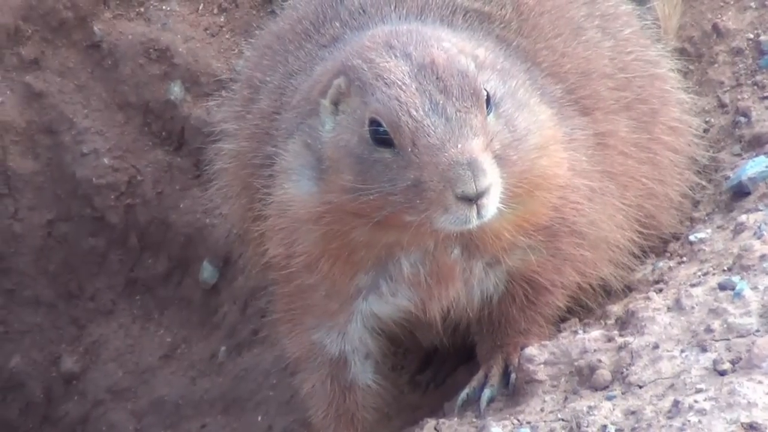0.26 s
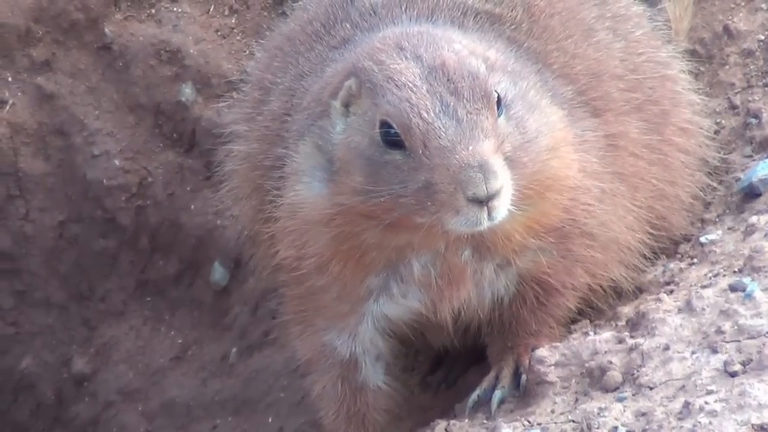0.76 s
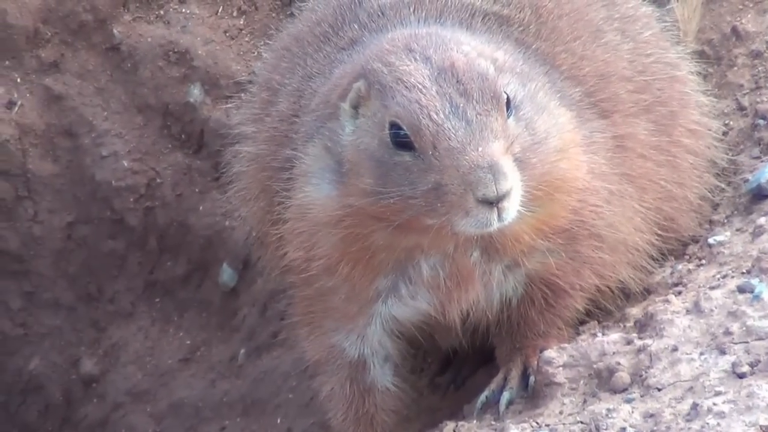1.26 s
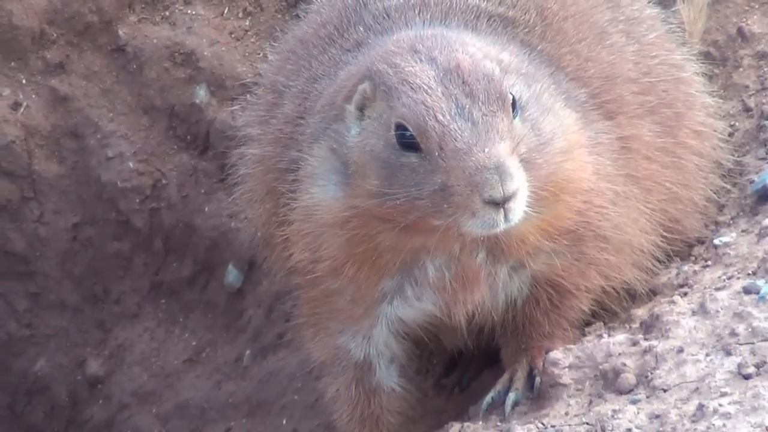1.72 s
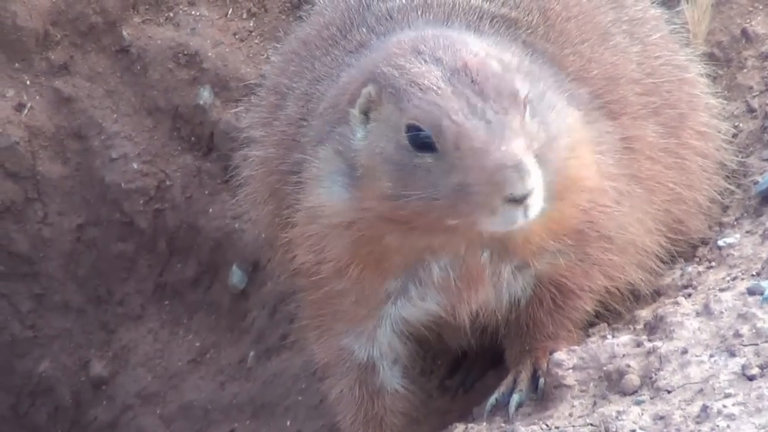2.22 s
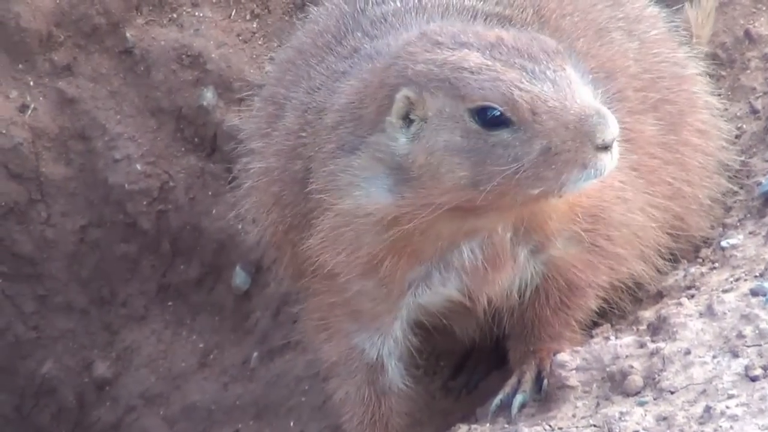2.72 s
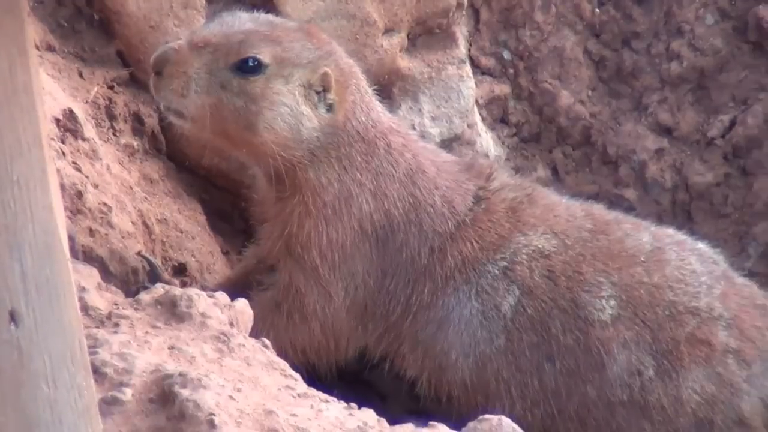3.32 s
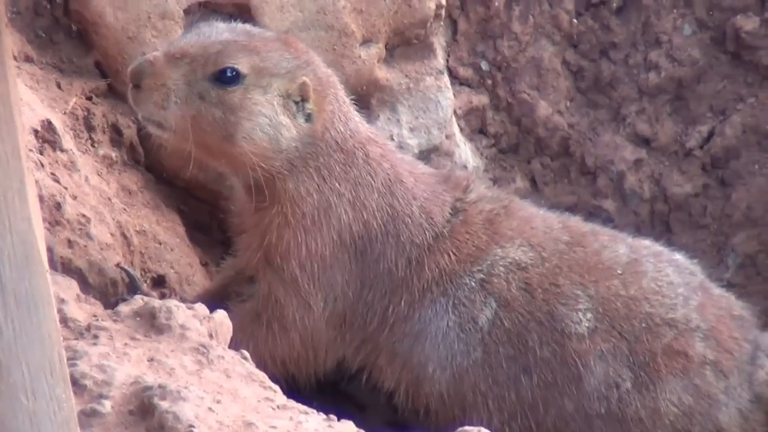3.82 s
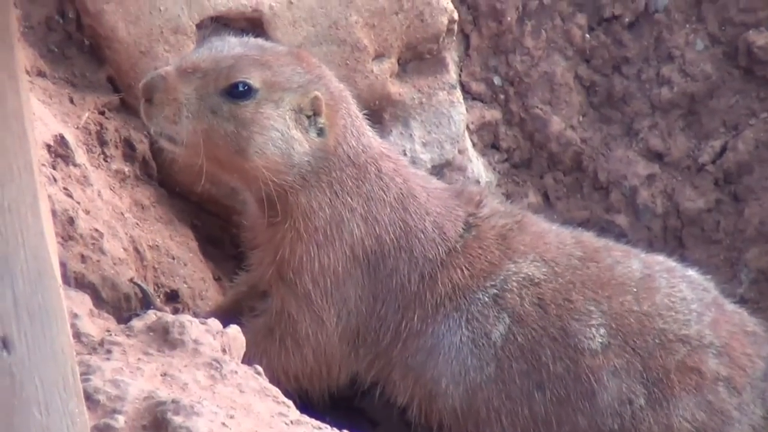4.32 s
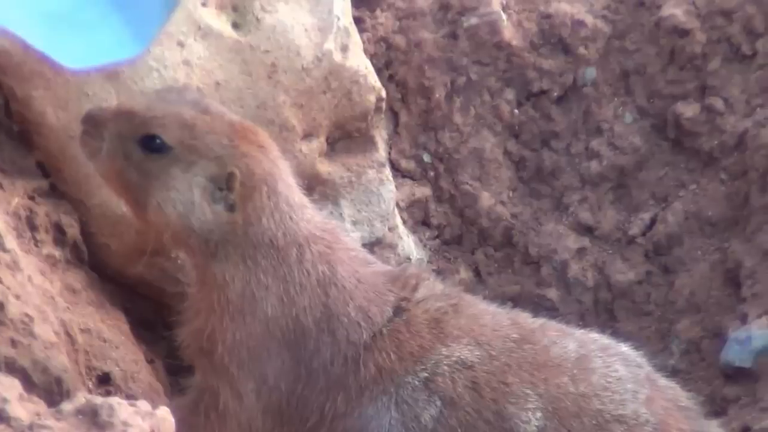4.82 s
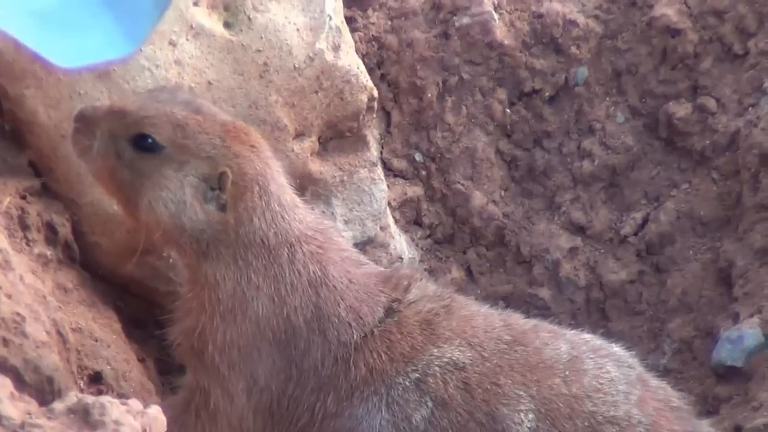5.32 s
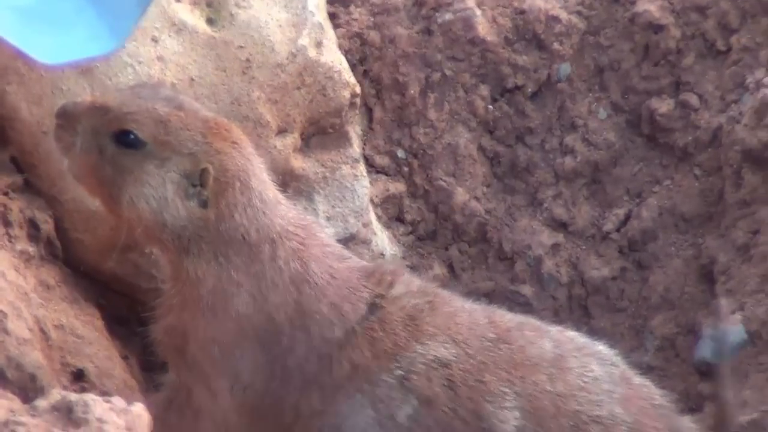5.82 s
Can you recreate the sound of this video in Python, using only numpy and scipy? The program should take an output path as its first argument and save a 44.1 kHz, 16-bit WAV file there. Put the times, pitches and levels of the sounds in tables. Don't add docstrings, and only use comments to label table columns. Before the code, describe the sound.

Quiet outdoor air with faint distant bird whistles, then an abrupt cut to a prairie dog giving sharp, high, evenly spaced barks close by.

```python
import sys
import numpy as np
from scipy import signal
from scipy.fft import rfft, irfft
from scipy.io import wavfile
from scipy.ndimage import uniform_filter1d

SR = 44100
rng = np.random.default_rng(int(sys.argv[2]) if len(sys.argv) > 2 else 0)


def rack_gain(trim_db):
    fader = np.asarray(trim_db, float)
    return 10 ** (fader / 20)


def dump(signal):
    limited = np.clip(np.atleast_2d(signal).T, -1, 1)
    pcm = np.round(limited * 32767).astype(np.int16)
    wavfile.write(sys.argv[1], SR, pcm)


N = 267246
CHANGE_S, TURN_S = 2.9243, 4.75


def rms_one(x):
    return x / np.sqrt(np.mean(x ** 2) + 1e-20)


def at_hz(points, hz):
    points_hz, values = np.array(points).T
    return np.interp(np.log(hz), np.log(points_hz), values)


def band(x, low_hz, high_hz):
    sos = signal.butter(2, [low_hz, min(high_hz, SR / 2.1)], "band", fs=SR, output="sos")
    return signal.sosfilt(sos, x)


def wobble(size, hz):
    settle = 4000
    sos = signal.butter(4, hz, fs=SR, output="sos")
    return rms_one(signal.sosfilt(sos, rng.standard_normal(size + settle))[settle:])


# frequency in Hz, level in dB per Hz.
AIR_COLOUR = [(15, -59), (25, -52), (44, -14.5), (90, -6.5), (130, -3), (199, -3.5), (260, -7),
              (443, -10.5), (534, -10.5), (934, -13), (1430, -19.5), (2780, -23), (5560, -28), (7860, -22),
              (14500, -36)]
# frequency in Hz, change in dB.
RECOLOUR = [(30, 8.5), (100, 0), (300, 2), (1000, 0.8), (2500, 2.5), (5000, 1.2), (8000, 4.5), (13000, 0)]
# frequency in Hz, left minus right in dB.
AIR_LEAN = [
    [(60, 7), (180, 3.5), (540, 5.5), (1640, 2.5), (4920, -0.5), (14800, -4)],
    [(60, 0), (180, 1), (540, 4), (1640, 1.5), (4920, -1.5), (14800, -3)],
]
# frequency in Hz, likeness from 0 to 1.
LIKENESS = [(60, 0.9), (180, 0.95), (540, 0.91), (1640, 0.97), (4920, 0.72), (14800, 0.62)]
# frequency in Hz, width in Hz, level
# in dB over the hiss.
WHINES = [(2790, 40, 6.5), (3010, 21, 10.5), (7150, 22, 11.5), (7800, 71, 0), (8400, 30, 5), (8930, 74, 7),
          (14740, 180, 7), (13750, 980, 7.5)]


def air(change, lean, level_db):
    mid, side = rfft(rng.standard_normal((2, N)))
    hz = np.arange(len(mid)) * SR / N + 1
    alike = np.clip(at_hz(LIKENESS, hz), 0, 1)
    pair = np.sqrt(1 + alike) * mid + np.sqrt(1 - alike) * side * [[1], [-1]]
    whine_db = sum(db / (1 + (2 * (hz - at) / width) ** 2) for at, width, db in WHINES)
    colour_db = at_hz(AIR_COLOUR, hz) + change * at_hz(RECOLOUR, hz) + whine_db
    side_db = at_hz(lean, hz) * [[.5], [-.5]]
    noise = rms_one(irfft(pair * rack_gain(colour_db + side_db), N))
    return rack_gain(level_db + 0.27 * wobble(N, hz=4.1)) * noise


def glides(notes, overtone_db, uneven_db):
    out = np.zeros(N)
    for s, length, from_hz, to_hz, level_db in notes:
        at, size = round(s * SR), round(length * SR)
        turns = 2 * np.pi * np.cumsum(np.linspace(from_hz, to_hz, size)) / SR
        whistle = np.sin(turns) + rack_gain(overtone_db) * np.sin(2 * turns)
        level = rack_gain(level_db + 6.5 + uneven_db * wobble(size, hz=180))
        out[at:at + size] += level * signal.windows.tukey(size, .5) * whistle
    return out


# start in seconds, length in seconds, from Hz, to Hz, level in dB.
BIRD_NOTES = [(.575, 0.03, 3640, 3510, -47.5), (.598, 0.031, 3600, 1530, -49),
              (.64, 0.021, 3460, 3900, -47), (.662, 0.03, 3730, 2120, -49),
              (1.012, 0.033, 3670, 3630, -45.5), (1.036, .027, 3654, 2040, -48.5),
              (1.07, 0.0244, 3300, 3780, -46.5), (1.108, 0.0202, 3510, 2600, -50.5),
              (2.137, .022, 5170, 4560, -57.5), (2.188, 0.021, 3840, 3400, -60),
              (2.615, .024, 5200, 4600, -63)]


def far_birds():
    return glides(BIRD_NOTES, overtone_db=-17, uneven_db=3.0)


# delay in seconds, level in dB, twice the left minus right in dB.
ECHOES = [(.004, -16, 58), (.0105, 1.5, -8.5), (.021, -27.5, -3), (.044, -16, -7), (.062, -42, -4),
          (.118, -33.5, -17), (.145, -59, -22)]


def pen(x, near_db, far_db, echo_db, lumpy_db):
    near_t60_s, far_t60_s = 0.27, 0.98
    t = np.arange(SR * 3 // 4) / SR
    shared, own = rng.standard_normal((2, len(t)))
    apart = 0.19 * band(band(own, 3900, 16000), 3900, 16000) + 0.25 * own
    build = np.minimum(t / .009, 1)
    scatter = (shared + apart * [[1], [-1]]) * rack_gain(lumpy_db * wobble(len(t), hz=88)) * build
    answer = scatter * (rack_gain(near_db - 60 * t / near_t60_s) + rack_gain(far_db - 60 * t / far_t60_s))
    for k, (delay, level_db, pan_db) in enumerate(ECHOES):
        side_db = pan_db * np.array([.25, -.25])
        answer[:, round(delay * SR)] += rack_gain(level_db + echo_db + side_db) * (-1) ** k
    answer = band(answer, 2140, 8440)
    return signal.fftconvolve(x[None], answer, axes=1)[:, :N]


REST_HZ, SAG_HZ_PER_S = (1609, 1585), (28000, 17800)
ATTACK_S, ATTACK_DB, MUFFLED_DB = (0.0063, 0.0085), (-9.5, -11.5), (-2, 0)
EASE_S, EASE_DB = (.018, 0.022), (0, 3.5)
CREST_DB, RELEASE_DB = (9, 9.5), (-3, -12)
UNDERSHOOT_HZ = (39.7, -6)
OPEN_HZ, BRIGHT_DB_PER_HZ = (1782, 1680), (0.17, 0.2)
BRIGHT_DB, CLOSING_DB = (2.5, 3.5), (-5.5, 0.8)
FLUTTER_START, FLUTTER_EASE, FLUTTER_CREST = (0.11, 0.056), (0.3, 0.16), (0.18, 0.18)


def bark_controls(crest_s, crest_hz, climb_s, push_db, pose):
    rest_hz, sag = REST_HZ[pose], SAG_HZ_PER_S[pose]
    end_s = crest_s + (crest_hz - rest_hz + UNDERSHOOT_HZ[pose]) / sag
    t = np.arange(round(end_s * SR)) / SR
    climb = (1 - np.exp(-t / climb_s)) / (1 - np.exp(-crest_s / climb_s))
    pitch_hz = np.minimum(rest_hz + (crest_hz - rest_hz) * climb, crest_hz - sag * (t - crest_s))

    lazy_db = 525 * climb_s
    stages = [0, ATTACK_S[pose], EASE_S[pose], crest_s, end_s]
    efforts = [ATTACK_DB[pose], 0, EASE_DB[pose] - lazy_db / 2,
               CREST_DB[pose] - lazy_db, RELEASE_DB[pose] - lazy_db / 2]
    effort_db = push_db + np.interp(t, stages, efforts)

    mouth_db = BRIGHT_DB_PER_HZ[pose] * np.minimum(pitch_hz - OPEN_HZ[pose], 0)
    stage_db = np.interp(t, stages[:4], [MUFFLED_DB[pose], 0, 0, CLOSING_DB[pose]])
    bright_db = BRIGHT_DB[pose] + mouth_db + stage_db
    flutters = [FLUTTER_START[pose], FLUTTER_EASE[pose], FLUTTER_CREST[pose]]
    flutter = np.interp(t, stages[1:4], flutters)
    return pitch_hz, effort_db, bright_db, np.clip(flutter, 0, 1)


# start in seconds, time to the crest in seconds, crest pitch in Hz,
# climb time in seconds, effort in dB.
BARKS = [
    (2.867, .034, 1955, 0.00597, -15),
    (3.298, .034, 1849, .011, -13.5),
    (3.711, .0325, 2020, .008, -13.5),
    (4.118, .029, 2064, 0.0062, -13.5),
    (4.605, 0.032, 1810, .022, -12),
    (5.095, .034, 1825, 0.015, -18.5),
    (5.49, 0.034, 1844, 0.018, -16.5),
    (5.863, .036, 1837, 0.014, -18),
]
# frequency in Hz, level in dB.
THROAT = [
    [(1600, -23), (1900, -10.5), (3300, 0), (3700, -2), (4150, -5), (5000, -23.5), (6100, -3), (6700, -12),
     (7250, -7), (8200, 3), (9300, -22), (10300, -14), (10900, -48), (11700, -20)],
    [(1600, -16.5), (1850, -7), (3250, 0), (3700, 7.5), (5000, -24), (5700, -12), (6500, -14), (6950, -6.5),
     (7250, -19), (7600, 2.5), (8400, -12), (8800, -14.5), (9300, -29), (11000, -48)],
]


def barks():
    out = np.zeros(N)
    for s, *call_shape in BARKS:
        at, pose = round(s * SR), int(s > TURN_S)
        pitch_hz, effort_db, bright_db, flutter = bark_controls(*call_shape, pose)
        size = len(pitch_hz)
        pitch_hz = uniform_filter1d(pitch_hz, size=120, mode="nearest")
        pitch_hz = pitch_hz * (1 + 0.0097 * wobble(size, hz=295))
        slow_hz = 372 * pitch_hz / 1830 * (1 + 0.074 * wobble(size, hz=120))
        call = 0
        for k in range(1, 7):
            shake = flutter * min(0.22 * k, 1.3)
            for side, share in ((0, 0.73), (-0.7, 0.48 * shake), (0.93, 1.77 * shake)):
                hz = k * pitch_hz + side * slow_hz
                level_db = at_hz(THROAT[pose], hz) + effort_db + bright_db * (k > 2)
                level_db = level_db - np.maximum(hz - 11900, 0) / 40
                rough = 1 + (0.03 + 0.25 * shake) * wobble(size, hz=400)
                tone = np.sin(2 * np.pi * np.cumsum(hz) / SR + k * side)
                call = call + share * rack_gain(level_db + 5.5) * rough * tone
        air_flow = rng.standard_normal(size) * flutter * rack_gain(effort_db)
        low = rack_gain(5.0) * band(band(air_flow, 2320, 3720), 2320, 3720)
        high = rack_gain(5.5 + bright_db) * band(band(band(air_flow, 5600, 9900), 5600, 9900), 5600, 9900)
        from_edge = np.minimum(np.arange(size), np.arange(size)[::-1])
        fade = np.minimum(1, from_edge / (0.0014 * SR))
        out[at:at + size] += fade * (call + low + high)
    return out


# peak time in seconds, level in dB.
STROKES = [
    (4.364, -32),
    (4.374, -31),
    (4.406, -33.5),
]


def stroke_db(t):
    levels = []
    for s, db in STROKES:
        dig_db = 2000 * (t - s)
        lift_db, trickle_db = 500 * (s - t), -12 + 130 * (s - t)
        levels.append(db + np.where(t < s, dig_db, np.maximum(lift_db, trickle_db)))
    return np.max(levels, axis=0)


def scuff():
    at, size, out = round(STROKES[0][0] * SR) - SR // 20, SR // 4, np.zeros(N)
    t = (at + np.arange(size)) / SR
    grit_db, dust_db = stroke_db(t), -12.5 + stroke_db(t - 0.0097)
    grains = rng.standard_normal(size) * rack_gain(3 * wobble(size, hz=200))
    grit = rms_one(band(band(grains, 1650, 2800), 1530, 3100))
    dust = rms_one(band(grains, 5700, 9200))
    out[at:at + size] = rack_gain(grit_db) * grit + rack_gain(dust_db) * dust
    return out


# start in seconds, length in seconds, from Hz, to Hz, level in dB.
TICK_AND_ANSWER = [
    (4.555, 0.0053, 1890, 3900, -43),
    (4.758, 0.055, 3770, 3830, -54),
]


def tick_and_answer():
    return glides(TICK_AND_ANSWER, overtone_db=-22, uneven_db=5.5)


def scene():
    birds, voice = far_birds(), barks()
    small = scuff() + tick_and_answer()
    distant = band(band(birds, 1800, 3540), 2400, 3660)
    first = air(0, AIR_LEAN[0], level_db=-41.5) + birds
    first = first + pen(distant, near_db=-58, far_db=-31.5, echo_db=-45, lumpy_db=0)
    pan_db = 1.6
    second = air(1, AIR_LEAN[1], level_db=-41.5)
    second = second + (voice + small) * rack_gain([[pan_db / 2], [-pan_db / 2]])
    second += pen(voice + small, near_db=-42.0, far_db=-68, echo_db=-9.0, lumpy_db=2.5)
    return np.where(np.arange(N) < CHANGE_S * SR, first, second)


# frequency in Hz, drop in dB.
SPARE = [(700, 45), (1200, 25), (2500, 28), (4600, 15), (7000, 19), (9800, 3.5), (11500, 3.5), (14000, 4)]


def starve(x, share, recover_db_s):
    hz, t, z = signal.stft(x, SR, "cosine", 2048)
    bands = z[:, :1024].reshape(2, 128, 8, -1)
    band_hz = hz[4:1024:8]
    level_db = 10 * np.log10((np.abs(bands) ** 2).sum(axis=(0, 2)) + 1e-15)
    peak_db = level_db.max(axis=0)
    loud_db = np.maximum(peak_db - np.median(peak_db), 0)
    busy_db = np.maximum.accumulate(loud_db + recover_db_s * t) - recover_db_s * t
    chance_db = 4.5 * uniform_filter1d(rng.standard_normal(level_db.shape), 3)
    hungry = (t > CHANGE_S) & (t < TURN_S)
    top_share = share + 0.43 * (band_hz[:, None] > 12600)
    masked_db = top_share * busy_db + 4.9 * hungry + chance_db
    above_usual_db = level_db - np.median(level_db, axis=1)[:, None]
    kept = above_usual_db > masked_db - at_hz(SPARE, band_hz)[:, None]
    z[:, :1024] *= np.repeat(kept, 8, axis=0) * (hz[:1024, None] < 14560)
    return signal.istft(z, SR, "cosine", 2048)[1][:, :N]


def low_pass(x):
    return signal.sosfilt(signal.butter(12, 15420, fs=SR, output="sos"), x)


def record(dry):
    t = np.arange(N) / SR
    over_db = np.maximum(20 * np.log10(np.abs(dry).max(axis=0) + 1e-9) + 6.9, 0)
    held_db = np.maximum.accumulate(over_db + 250 * t) - 250 * t
    quick = np.exp(-1 / (.0008 * SR))
    limited = dry * rack_gain(-signal.lfilter([1 - quick], [1, -quick], held_db))
    rounded = 0.72 * np.tanh(limited / 0.7)
    mix = starve(rounded, share=0.14, recover_db_s=306)
    return low_pass(mix)


dry = scene()
out = record(dry)
dump(out)
```